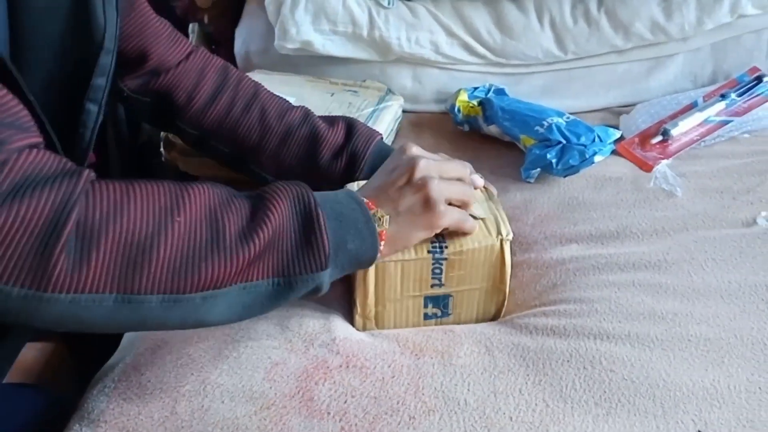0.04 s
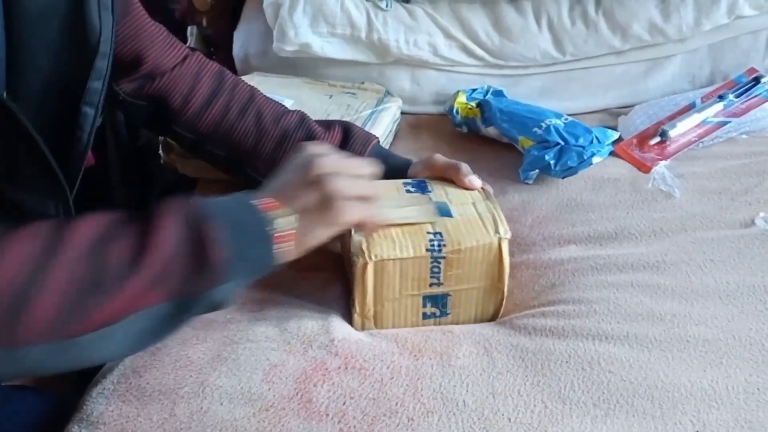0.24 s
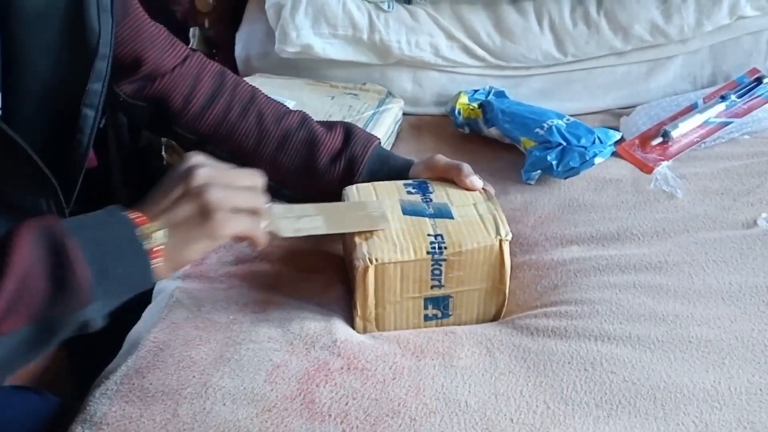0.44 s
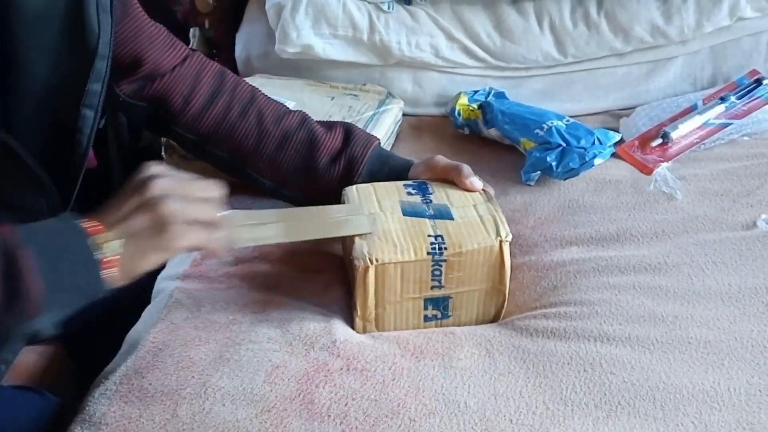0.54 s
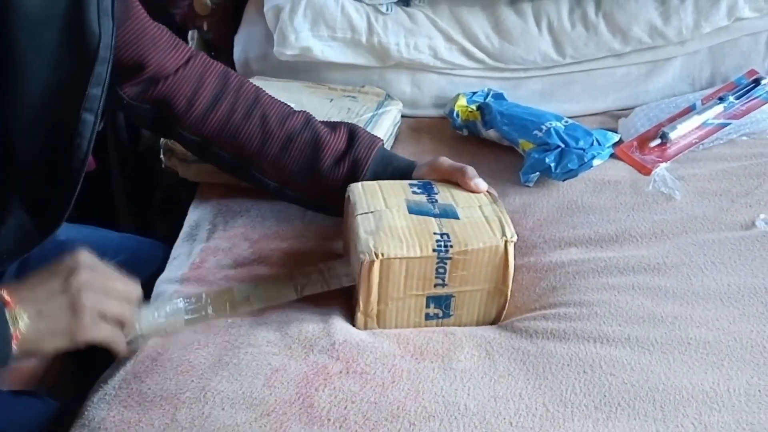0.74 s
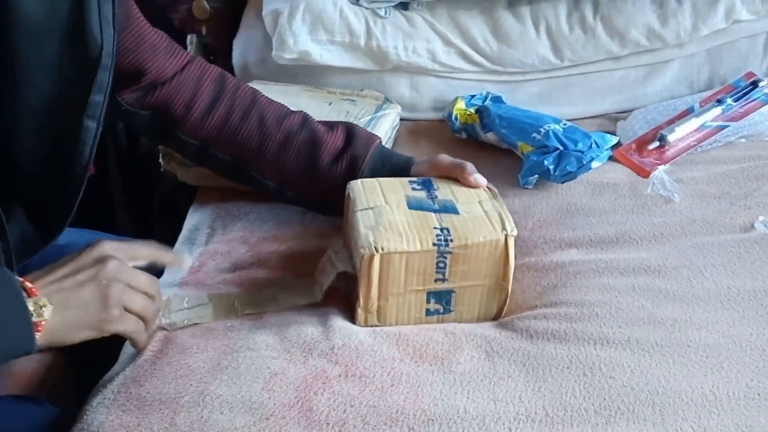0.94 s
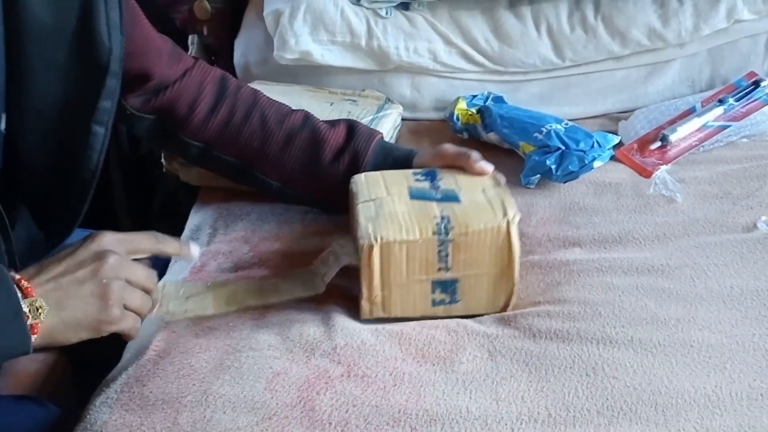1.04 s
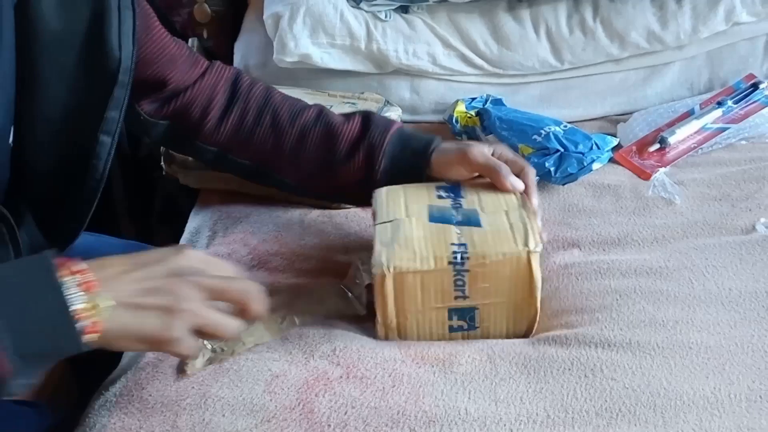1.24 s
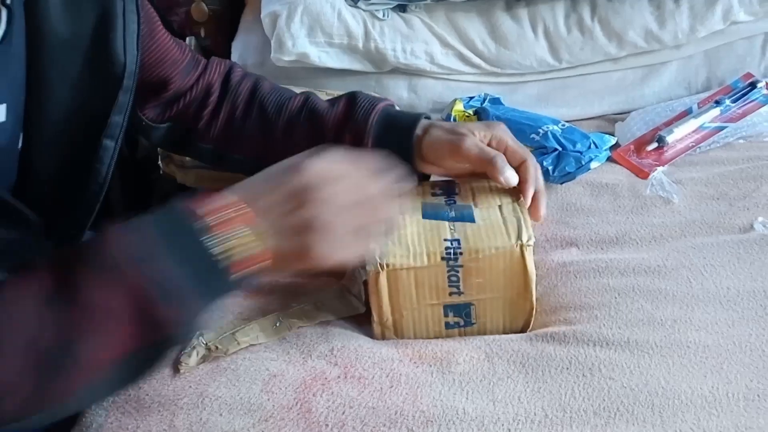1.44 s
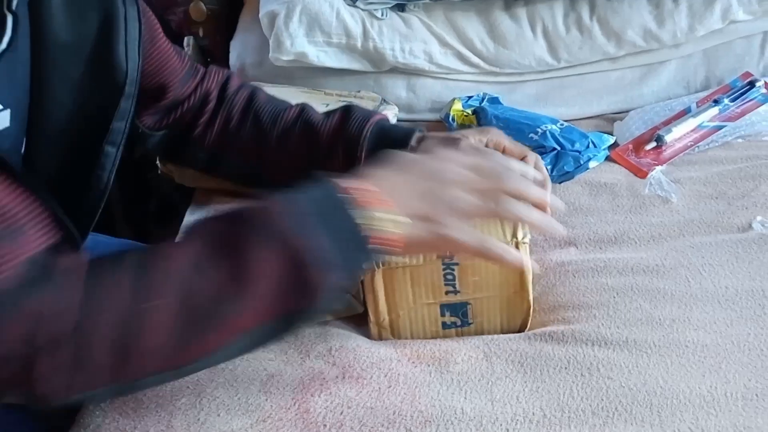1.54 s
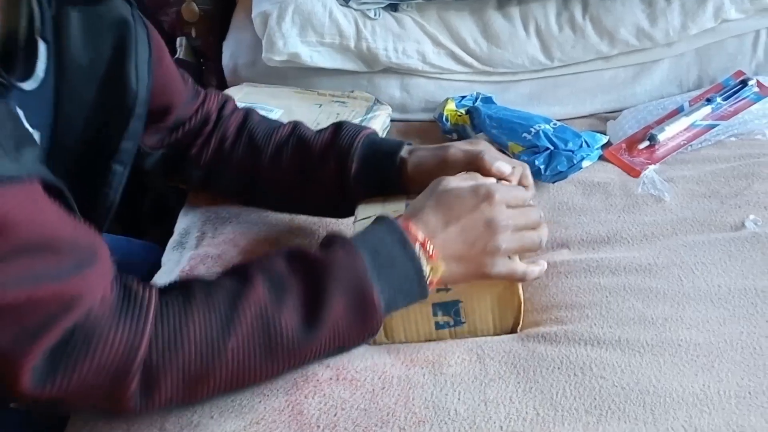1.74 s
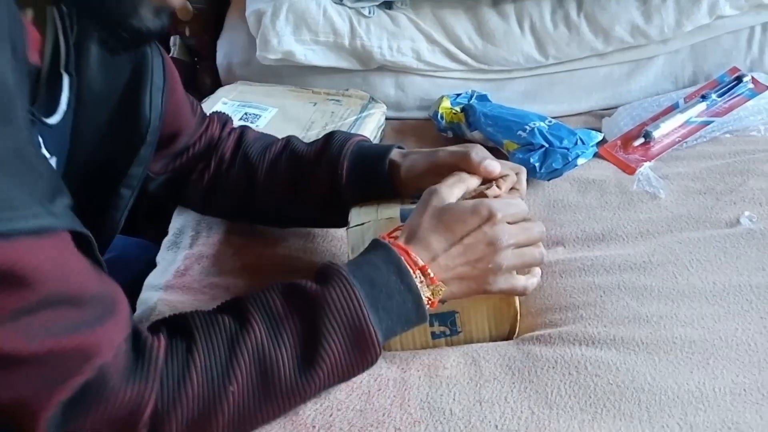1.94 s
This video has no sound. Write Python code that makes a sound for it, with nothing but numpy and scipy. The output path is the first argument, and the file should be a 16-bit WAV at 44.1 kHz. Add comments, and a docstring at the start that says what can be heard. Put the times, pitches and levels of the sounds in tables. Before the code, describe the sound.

Packing tape ripped off a small cardboard box in harsh jerks, then faint crinkles and taps

```python
"""Packing tape is ripped off a small cardboard box in four jerks, close to a mono microphone in a bedroom.
The glue lets go in dense uneven slips: clumped random clicks, coloured as tape crackle, that also drive
the modes of the box. Single snaps are short noise bursts, and swelling sine notes drum on the box.
Then the loose strip crinkles, hands brush and tap the cardboard and one faint narrow hiss sounds near 2 kHz,
as bands of clicks in short strokes. Sparse reflections surround it, over a room tone of filtered noise."""
import sys
import numpy as np
from scipy import signal
from scipy.io import wavfile
from scipy.ndimage import uniform_filter1d

SR = 44100
rng = np.random.default_rng(int(sys.argv[2]) if len(sys.argv) > 2 else 0)


def makeup_ratio(level_db):
    """Linear amplitude ratio for a level in decibels (20 dB per factor of ten)."""
    decades = np.asarray(level_db, float) / 20
    return 10 ** decades


def bounce(signal):
    """Save signal as a 16-bit WAV file at the path given by the first command-line argument."""
    frames = np.transpose(np.atleast_2d(signal))
    limited = np.clip(frames, -1, 1)
    pcm = np.round(limited * 32767).astype(np.int16)
    wavfile.write(sys.argv[1], SR, pcm)


N = 88200  # samples in the scene


def rip():
    """Slips of the glue line crackle in the tape, ring the panels, tug the hollow box and rock it."""
    # The course of the pull. Each row: time in seconds, then the levels in dB of the tape crackle,
    # the box panels, the hollow of the box and the rocking of the box.
    pull = [(0.0, -45, -56, -52, -55), (0.038, -59, -55.5, -80, -87), (0.057, -43, -74, -72, -55),
            (0.071, -27, -41, -62, -40), (0.087, -18, -34, -47, -47.5), (0.143, -39.5, -55.5, -60, -57),
            (0.174, -58, -59.5, -79, -69.5), (0.219, -53.5, -52.5, -54.5, -47),
            (0.239, -37.5, -47.5, -50, -53), (0.261, -30, -34.5, -48, -43),
            (0.31, -31.5, -39.5, -42, -42.5), (0.34, -15.5, -28, -35, -40),
            (0.39, -14.5, -24.5, -33.5, -38.5), (0.448, -21, -25.5, -32, -46.5),
            (0.486, -13.5, -23, -29.5, -36), (0.506, -23, -37, -34.5, -50.5),
            (0.542, -34, -45.5, -41, -47.5), (0.562, -36.5, -44, -42.5, -52.5),
            (0.594, -51.5, -54, -52, -47), (0.612, -30.5, -37.5, -45, -48),
            (0.638, -42.5, -47.5, -46, -49.5), (0.674, -42, -41.5, -39.5, -50),
            (0.702, -37, -43.5, -51, -47), (0.747, -43.5, -48, -55, -52.5), (0.77, -24, -24.5, -30.5, -33),
            (0.796, -16, -26, -22, -29.5), (0.821, -19.5, -21.5, -26.5, -33.5),
            (0.862, -21, -25.5, -37.5, -33.5), (0.914, -42, -50.5, -50, -66),
            (0.979, -82.5, -111, -77, -67.5)]
    # Colour of the tape crackle. Each row: frequency in Hz, density in dB per Hz.
    tape_colour = [(1500, -14), (2300, -3.5), (3300, -2), (4300, -4.5), (5300, -1.5), (7200, -1),
                   (9000, -2), (15000, -6.5)]
    # Broad colour of the panels. Each row: frequency in Hz, density in dB per Hz.
    panel_colour = [(400, -15), (700, -1), (1000, 3), (1600, 4), (2600, 2), (3600, -24.5)]
    # Panel modes. Each row: frequency in Hz, relative strength in dB, t60 in seconds.
    panel_modes = [(810, 0, .03), (965, -4, .03), (1110, -1, .03), (1610, 1, .035), (1900, -3, .03),
                   (2510, -2, .03)]
    # Modes of the hollow of the box. Each row: frequency in Hz, relative strength in dB, t60 in seconds.
    hollow_modes = [(330, 4, .055), (435, 0, .05), (530, 0, .05)]
    # The whole box rocking on the bed. Each row: frequency in Hz, relative strength in dB, t60 in seconds.
    rock_modes = [(110, -7, .09), (154, -2, .07), (200, 0, .06), (245, 2, .06)]
    ring_share = 0.2  # part of the panel power that rings in modes

    times, *levels_db = np.transpose(pull)
    t = np.arange(N) / SR
    tape, panel, hollow, rock = (makeup_ratio(np.interp(t, times, db, right=-120)) for db in levels_db)

    fine = slips(N, per_s=15000, spread_db=3.3)
    coarse = tugs(N)
    both = patchy(evened(fine) + evened(coarse))

    crackle = driven(lambda x: coloured(x, lambda hz: read(tape_colour, hz)), patchy(fine), tape)
    panel_noise = driven(lambda x: coloured(x, lambda hz: read(panel_colour, hz)), both, panel)
    panel_ring = travelling(both, panel_modes, panel)
    panels = np.sqrt(1 - ring_share) * panel_noise + np.sqrt(ring_share) * panel_ring
    boom = travelling(coarse, hollow_modes, hollow)
    rocking = travelling(coarse, rock_modes, rock)
    return crackle + panels + boom + rocking


def slips(size, per_s, spread_db):
    """Sparse clicks of random sign and exponentially spread dB size, swelling and thinning in clumps."""
    clump_db, clump_s = 1.5, 0.0013  # rms swing of the size, smoothing window
    chance, excess = rng.random(size), rng.exponential(1, size)
    drift, sign = rng.standard_normal(size), np.sign(rng.standard_normal(size))
    clump = evened(uniform_filter1d(drift, max(round(clump_s * SR), 2)))
    return (chance < per_s / SR) * sign * makeup_ratio(spread_db * np.minimum(excess, 4) + clump_db * clump)


def tugs(size):
    """Coarser, rarer slips that jerk the cardboard."""
    return slips(size, per_s=2200, spread_db=-1)


def patchy(x):
    """Shifts the colour in short patches of time and pitch, in the rip as the peel angle changes."""
    patch_db = 2.5  # rms
    z = signal.stft(x, nperseg=256)[2]
    patches = uniform_filter1d(rng.standard_normal(z.shape), size=9, axis=0)  # across pitch
    patches = uniform_filter1d(patches, size=6, axis=1)  # across time
    return signal.istft(z * makeup_ratio(patch_db * evened(patches)), nperseg=256)[1][:len(x)]


def travelling(x, modes, level):
    """The glue line moves over the box, so it drives each mode by a changing amount."""
    wander_db = 2  # rms
    out = 0
    for k, mode in enumerate(modes):
        drive = x * level * makeup_ratio(wander_db * wander(N))
        out = out + (-1) ** k * ringing(drive, [mode])
    return out / np.std(ringing(x, modes))


def wander(size):
    """Slow random drift of unit rms."""
    window = round(0.03 * SR)
    drift = uniform_filter1d(rng.standard_normal(size), window)
    return evened(uniform_filter1d(drift, window))


def ringing(x, modes):
    """Strikes a set of dying modes, neighbours in opposite phase."""
    t = np.arange(SR // 5) / SR
    body = np.zeros(len(t))
    for k, (hz, db, t60) in enumerate(modes):
        body += (-1) ** k * makeup_ratio(db - 60 * t / t60) * np.sin(2 * np.pi * hz * t)
    return signal.oaconvolve(x, body)[:len(x)]


def snap(start, db, hz, octaves, t60):
    """One crack and a ragged, fast-dying burst of noise in one band, broad or narrow."""
    first_crack = 3  # opening click against the rms of the ragged tail
    t = np.arange(3000) / SR
    grains = rng.standard_normal(len(t)) + first_crack * (t == 0)
    burst = band(makeup_ratio(-60 * t / t60) * grains, hz, octaves)
    return start, makeup_ratio(db) * burst / abs(burst).max()


def knock(start, db, hz):
    """A jerk drums one note of the box, which swells for a few milliseconds and dies."""
    rise_s, t60 = 0.005, 0.07  # time constant of the swell, decay in seconds
    t = np.arange(SR // 5) / SR
    shape = (1 - np.exp(-t / rise_s)) * makeup_ratio(-60 * t / t60)
    note = np.sin(2 * np.pi * (hz * t + rng.random()))
    return start, makeup_ratio(db) * shape / shape.max() * note


def rustle(start, length, db, hz, octaves):
    """Dense clicks crackle in one band, broad or narrow, of shifting colour."""
    top_hz, top_db = 9300, -14.5  # above this pitch, gain per octave
    t = np.arange(SR // 3) / SR
    crackle = patchy(slips(len(t), per_s=7800, spread_db=4.2))
    crackle = band(crackle, hz, octaves)
    crackle = coloured(crackle, lambda f: top_db * np.maximum(np.log2((f + 1) / top_hz), 0))
    return start, makeup_ratio(db) * stroke(length, t, t60=0.16) * evened(crackle)


def press(start, length, db, hz, octaves):
    """Pushed or tugged, the cardboard gives with a dull uneven thud."""
    t = np.arange(SR // 3) / SR
    push = tugs(len(t))
    thud = driven(lambda x: band(x, hz, octaves), push, stroke(length, t, t60=0.06))
    return start, makeup_ratio(db) * thud


def stroke(length, t, t60):
    """The level rises, holds to the end of the stroke, then dies away."""
    rise = np.minimum(t / (0.26 * length), 1)  # full after 0.26 of the stroke
    return rise * makeup_ratio(-60 * np.maximum(t - length, 0) / t60)


def bedroom(x):
    """Sparse reflections of random sign, each band dying at its own speed."""
    # Decay of the room. Each row: frequency in Hz, t60 in seconds.
    decay = [(100, 0.045), (700, 0.084), (2000, .18), (5000, 0.14), (13000, 0.081)]
    taps = np.zeros(SR // 2)
    at = np.arange(120, SR // 2 - 20, 20)  # one reflection in each slot of 20 samples
    taps[at + rng.integers(0, 20, len(at))] = rng.choice([-1., 1.], len(at))
    hz, t, z = signal.stft(taps, SR, nperseg=256)
    dying = z * makeup_ratio(-60 * t / read(decay, hz)[:, None])
    tail = signal.istft(dying, SR, nperseg=256)[1]
    return signal.fftconvolve(x, tail / np.linalg.norm(tail))[:N]


def room_tone():
    """Quiet steady noise, shaped in the spectrum, with drifting patches."""
    # Colour of the room tone. Each row: frequency in Hz, relative density in dB per Hz.
    tone_colour = [(20, 23.5), (50, 14), (100, 6.5), (200, -0.5), (400, -4.5), (800, -9), (1400, -7.5),
                   (1950, -8), (2500, -10), (4000, -15), (7500, -15), (11000, -17.5), (16000, -21)]
    level_db, patch_db = -55, 1.2  # both rms
    frames, hz = N // 256 + 5, np.fft.rfftfreq(1024, 1 / SR)
    real, imaginary, patches = rng.standard_normal((frames, 513, 3)).T
    patches = uniform_filter1d(patches, size=12, axis=0)  # across pitch
    patches = evened(uniform_filter1d(patches, size=10, axis=1))  # across time
    z = (real + 1j * imaginary) * makeup_ratio(read(tone_colour, hz)[:, None] + patch_db * patches)
    return makeup_ratio(level_db) * evened(signal.istft(z, nperseg=1024, noverlap=768)[1][:N])


def driven(body, x, level):
    """Excites a body with x shaped by level, scaled so that a steady level of 1 gives unit rms."""
    return body(x * level) / np.std(body(x))


def band(x, hz, octaves):
    """One hump of the spectrum, 6 dB down at the given octaves from its centre."""
    return coloured(x, lambda f: -6 * (np.log2((f + 1) / hz) / octaves) ** 2)


def coloured(x, db_of):
    """Causal minimum-phase filter whose gain in dB is db_of(Hz), never below -80 dB."""
    hz = abs(np.fft.fftfreq(4096, 1 / SR))
    log_gain = np.log(makeup_ratio(np.maximum(db_of(hz), -80)))
    taps = np.fft.ifft(np.exp(np.conj(signal.hilbert(log_gain)))).real[:2048]
    return signal.oaconvolve(x, taps)[:len(x)]


def evened(x):
    """Scales a signal to unit rms."""
    return x / np.sqrt(np.mean(x ** 2) + 1e-20)


def read(points, hz):
    """Reads a curve of (Hz, value) points along log frequency."""
    f, value = np.transpose(points)
    return np.interp(np.log(hz + 1), np.log(f + 1), value)


def add(mix, s, sound):
    """Lays a sound into the mix at s seconds, cut at the end of the mix."""
    part = mix[round(s * SR):][:len(sound)]
    part += sound[:len(part)]


def scene():
    """The rip and the handling with their reflections, over the room tone."""
    # Single snaps. Each row: start in seconds, peak in dB, centre in Hz, width in octaves, t60 in seconds.
    snaps = [(0.051, -13.5, 8800, 1.4, 0.00097), (.073, -11, 6760, 0.35, 0.014),
             (.242, -33.5, 1510, 0.19, 0.059), (.323, -10.5, 6100, 0.52, 0.022),
             (.6085, -21.5, 1160, 0.35, 0.0098), (.757, -12, 5000, 2.2, 0.009),
             (.769, -4.5, 6930, 0.66, 0.015), (.7715, -10.5, 6030, 0.7, 0.0054),
             (1.023, -30, 7340, 0.85, 0.0048), (1.035, -25, 4900, 2.3, 0.0044),
             (1.061, -29, 2020, 0.86, 0.011), (1.073, -28.5, 6570, 0.4, 0.018),
             (1.08, -33.5, 5640, 0.38, 0.008), (1.328, -34, 2190, 2.16, 0.059),
             (1.339, -27, 3290, 1.6, 0.031), (1.348, -30, 5400, 0.45, 0.0039),
             (1.4657, -34.5, 1800, 0.6, 0.007), (1.4695, -35.5, 1800, 0.6, 0.006),
             (1.864, -35, 1940, 0.8, 0.063), (1.876, -38, 2810, 0.63, 0.041),
             (1.923, -37.5, 1070, 0.63, 0.012), (1.941, -39.5, 1500, 1.15, 0.061),
             (1.961, -35, 2770, 0.44, 0.0069)]
    # Crinkles, brushes and one faint narrow hiss near 2 kHz. Each row: start and length in seconds,
    # level in dB, centre in Hz, width in octaves.
    rustles = [(1.011, 0.053, -48.5, 6160, 1.5), (1.062, 0.021, -45.5, 5260, 2.6),
               (1.321, 0.037, -47.5, 4140, 2.4), (1.372, 0.048, -49.5, 7640, 0.8),
               (1.377, 0.028, -56, 1670, 0.63), (1.53, .15, -72, 1950, .09), (1.737, 0.042, -60, 2440, 3.2),
               (1.861, 0.04, -51.5, 2900, 2), (1.92, 0.12, -51.5, 3070, 2.1)]
    # Pushes and tugs on the box. Each row: start and length in seconds, level in dB, centre in Hz,
    # width in octaves.
    presses = [(0.194, 0.0054, -48, 338, 0.36), (1.364, 0.05, -58.5, 293, 0.6),
               (1.591, 0.019, -61, 421, 0.41), (1.726, 0.015, -59.5, 380, 0.62),
               (1.739, 0.04, -55, 154, 0.94), (1.855, 0.045, -51, 216, 1.), (1.928, 0.031, -50, 270, 1)]
    # Jerks that drum one note of the box. Each row: start in seconds, peak in dB, pitch in Hz.
    knocks = [(0.075, -38, 312), (0.242, -37, 243), (.264, -35.5, 238), (.352, -24, 321), (.402, -29, 435),
              (0.456, -21, 327), (0.478, -21, 341), (0.486, -29, 157), (.602, -31, 328), (.764, -21.5, 334),
              (0.807, -21.5, 346), (0.81, -17.5, 158.6), (0.82, -16, 523.3), (0.823, -21.5, 338)]

    tape, hands = rip(), np.zeros(N)
    for source, rows in (snap, snaps), (rustle, rustles), (press, presses), (knock, knocks):
        for row in rows:
            add(hands, *source(*row))
    reflections = bedroom(makeup_ratio(-8.5) * tape + makeup_ratio(-17) * hands)
    mono = tape + hands + reflections + room_tone()
    return np.array([mono, mono])


def roll_off(x):
    """The treble ends steeply here."""
    return signal.sosfilt(signal.butter(12, 16620, fs=SR, output="sos"), x)


def record(dry):
    """One small microphone, thin in the bass and dull at the top."""
    # Response of the microphone. Each row: frequency in Hz, gain in dB.
    response = [(20, -51), (60, -16.5), (95, -3.5), (140, 1), (9000, -1), (10500, -8.5), (15800, -2.5),
                (16300, -47.5)]
    mix = np.array([coloured(x, lambda hz: read(response, hz)) for x in dry])
    return roll_off(mix)


dry = scene()
out = record(dry)
bounce(out)
```